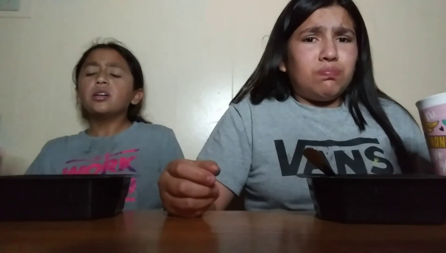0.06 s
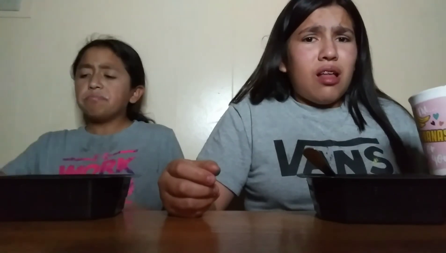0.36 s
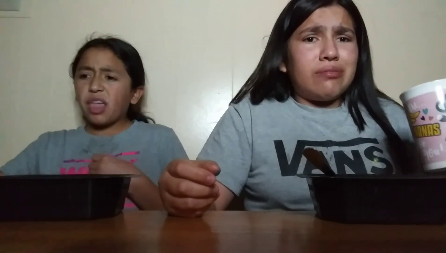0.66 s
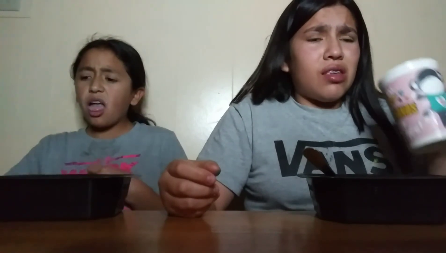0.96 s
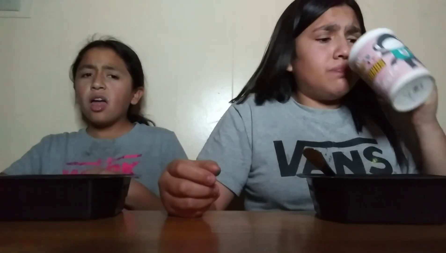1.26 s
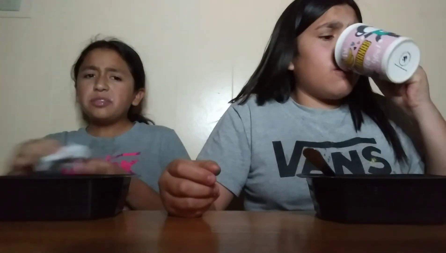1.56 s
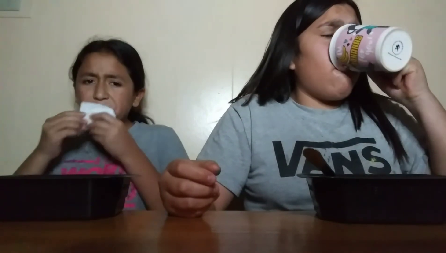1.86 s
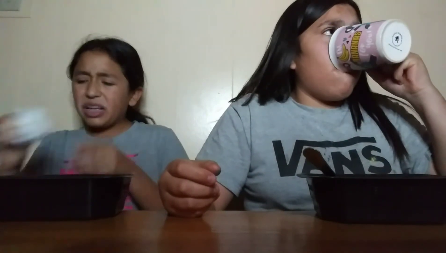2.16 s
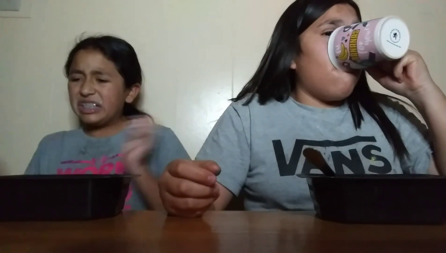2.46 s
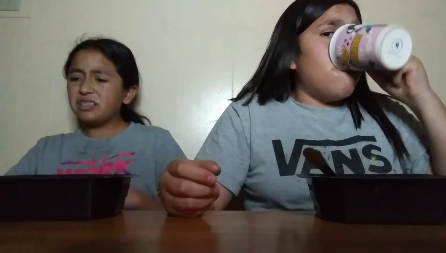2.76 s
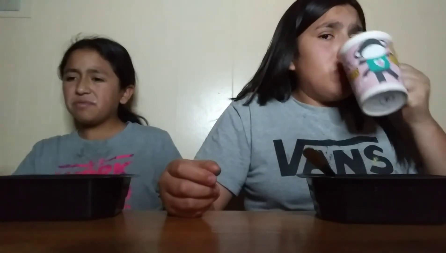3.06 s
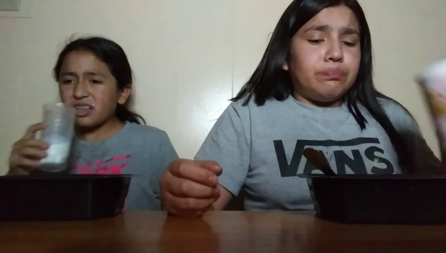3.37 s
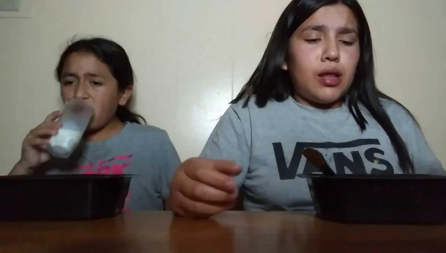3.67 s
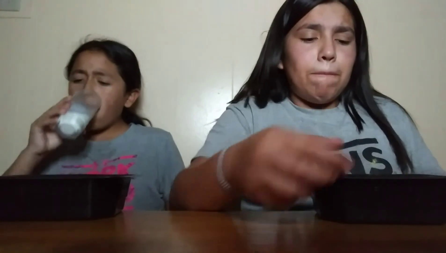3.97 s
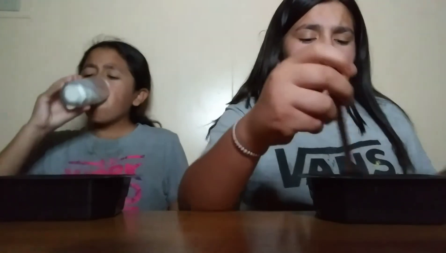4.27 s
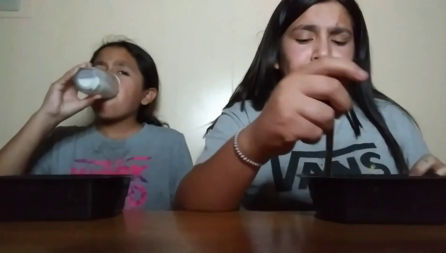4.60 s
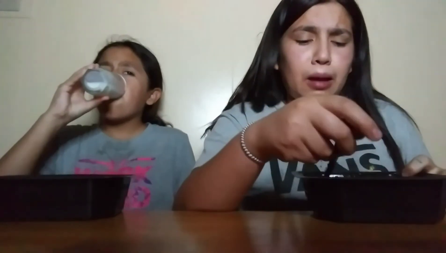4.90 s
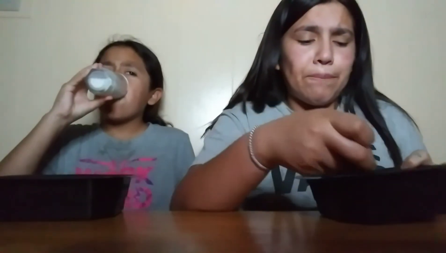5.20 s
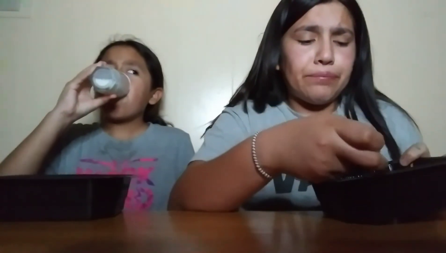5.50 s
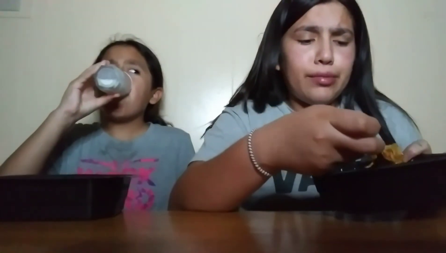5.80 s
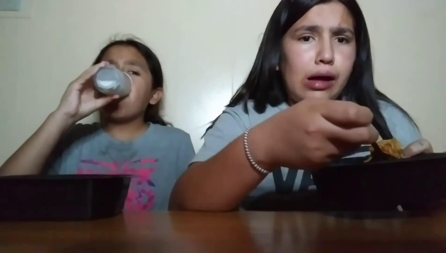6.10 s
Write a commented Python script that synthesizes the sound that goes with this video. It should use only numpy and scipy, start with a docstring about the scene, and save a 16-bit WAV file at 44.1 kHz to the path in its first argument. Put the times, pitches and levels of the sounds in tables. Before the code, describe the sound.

A plastic tumbler rattles on a wooden table, someone gulps, then a mug bangs down and a fork taps a plastic tray.

```python
"""A small, bare room: two people eat and drink at a wooden table, close to a microphone standing on it.
A plastic tumbler lands and rattles on its rim; a gulp and a squeak of suction at a mug follow, then the
mug comes down hard and sets the table top ringing. A fork clinks, knocks and pokes about in a plastic
food tray, among wet mouth clicks. An appliance hums behind it all; a limiter holds the loudest blows."""
import sys
import numpy as np
from scipy import signal
from scipy.io import wavfile
from scipy.ndimage import uniform_filter1d, minimum_filter1d

SR = 44100
rng = np.random.default_rng(int(sys.argv[2]) if len(sys.argv) > 2 else 0)


def unload_audio(sound):
    """Save the sound as a 16-bit wav file, at the path given as the first command line argument."""
    columns = np.transpose(np.atleast_2d(sound))
    # keep every value between -1 and 1, then stretch to whole-number steps
    steps = np.round(np.clip(columns, -1, 1) * 32767)
    wavfile.write(sys.argv[1], SR, steps.astype(np.int16))


N = 275580

# blows on the table: t/s, force/dB, contact cutoff/Hz, thud pitch/ratio, ring trim/dB, room send/dB
TABLE_BLOWS = [(0.4784, -6.5, 800, 1.023, 4.5, -1.5), (0.4931, -17, 640, 0.43, 0, 1.5),
               (0.546, -19.5, 895, 0.99, -4, 0.5), (.556, -13, 800, 0.83, 4.5, -2.5),
               (3.73, 6.5, 4800, 1.237, 0, -7), (3.7493, 0, 1600, 0.96, -27, -2.5),
               (3.8, -9, 1550, 1.028, 2, -0.5), (3.9895, -10.5, 3560, 1.57, -8, -6),
               (3.9916, -1, 1582, 0.79, -2.5, -8)]
# short thud at the point of contact: f/Hz, level/dB, t60/s
THUD_MODES = [(538, -3.5, 0.047), (786, 2, 0.026), (1129, 3, 0.01), (1830, -4, 0.014), (2590, -12, 0.0057),
              (4070, -9, 0.004)]
# long ring of the table top: f/Hz, level/dB, t60/s
TOP_MODES = [(215, -13, .3), (255, -14, .33), (339, -10, .33), (447, 2, .3), (475, -8, .25), (532, -5, .32),
             (608, -3, .36), (706, -4, .35), (725, -3, .38), (777, -4, .45), (802, -8, .4), (834, -8, .42),
             (883, -4, .35), (935, -2, .38), (981, 1, .36), (1024, -1, .34), (1053, 0, .38), (1150, -6, .3),
             (1222, -6, .42), (1327, -6, .36), (1367, -3, .3), (1475, -13, .3), (1690, -11, .3),
             (1914, -9, .25), (2035, -15, .3), (2326, -15, .3), (2460, -13, .28), (2610, -17, .28)]
# EQ of the wood's crack: f/Hz, level/dB
WOOD_EQ = [(60, -39), (250, 4), (900, 4.5), (2500, 14.5), (3500, -2), (5000, -3), (8000, -10.5),
           (15000, -7)]
def table_knocks(ring_db=-9, crack_db=-12, radiate_hz=330):
    """Blows thud and set the top ringing; soft contact dulls them. Returns direct sound and room send."""
    direct, send, top = np.zeros(N), np.zeros(N), ring(TOP_MODES)
    for s, db, cutoff_hz, pitch, ring_trim_db, send_db in TABLE_BLOWS:
        thud = ring([(hz * pitch, level, t60) for hz, level, t60 in THUD_MODES])
        thud += amp(crack_db) * crack(WOOD_EQ, t60=0.025)
        contact = signal.butter(2, cutoff_hz, fs=SR)
        add(direct, s, amp(db) * signal.lfilter(*contact, thud + amp(ring_db + ring_trim_db) * top))
        add(send, s, amp(db + send_db) * signal.lfilter(*contact, thud))
    # a small table top radiates little bass into the room
    return direct, signal.lfilter(*signal.butter(2, radiate_hz, "high", fs=SR), send)


# the tumbler's rim clacks on the wood, landing and settling: t/s, level/dB, brightness/(dB/octave)
RIM_CLACKS = [(.4832, -26.5, 5), (.4852, -29, 6), (.602, -22.5, -8.5), (.6465, -20, -6), (.664, -34, 6)]
# force of the rocking in between, easing and picking up again: t/s, level/dB
ROCK_ENVELOPE = [(.493, -25.5), (.507, -34), (.546, -42), (.559, -26.5)]
# dry click of the rim: f/Hz, level/dB, t60/s
RIM_MODES = [(1160, 13, 0.0084), (2190, 13, 0.011), (2880, 8, 0.016), (4360, 4.5, 0.011), (5700, -6, .007),
             (8150, -23, 0.0064)]
# hollow note of the tumbler's body: f/Hz, level/dB, t60/s
BODY_MODES = [(218.5, -9, 0.36), (444.5, -5, 0.33), (727, -4, 0.27), (900, 2, 0.23), (986, 5.5, 0.15)]
def tumbler(rock_start_s=0.493, rock_hz=75.3, rock_count=7, rock_tilt_db=4):
    """The hollow body rings as it lands, then it rocks on its rim and settles. Returns rim and body."""
    body = np.zeros(N)
    landing_s = TABLE_BLOWS[0][0]
    add(body, landing_s, amp(-12.5) * ring(BODY_MODES))
    times = rock_start_s + np.arange(rock_count) / rock_hz
    rocking = [(s, np.interp(s, *np.transpose(ROCK_ENVELOPE)), rock_tilt_db) for s in times]
    return plastic_hits(RIM_CLACKS + rocking, RIM_MODES, crack_db=-3.5), body


# fork taps on the food tray: t/s, level/dB, brightness/(dB/octave)
TRAY_TAPS = [(3.9925, -29, 11), (4.175, -13.5, 0.5), (4.3032, -20.5, -2.5), (4.3053, -20.5, -0.5),
             (4.466, -33, -3), (4.5828, -26, 2), (4.812, -32.5, 0), (4.8712, -32.5, 8.5)]
# dead knock of the tray: f/Hz, level/dB, t60/s
TRAY_MODES = [(338, -10, 0.011), (1020, -0.5, 0.013), (1160, -4, 0.024), (1370, 0, 0.0078),
              (2000, 0, 0.0039), (2780, -8, 0.0085), (4390, -11, 0.015), (6100, -14.5, 0.0056),
              (7900, -23.5, 0.0042)]
def tray_taps():
    """The fork pokes the thin plastic tray, which stops ringing almost at once."""
    return plastic_hits(TRAY_TAPS, TRAY_MODES, crack_db=-13)


# EQ of a tick on plastic: f/Hz, level/dB
PLASTIC_EQ = [(100, -11), (900, 6.5), (2500, 6.5), (3500, -9.5), (5500, -1.5), (8000, -16.5), (15000, -23)]
def plastic_hits(hits, modes, crack_db):
    """Light hits on a thin shell: quickly damped modes, and a tick that grows with brightness."""
    out = np.zeros(N)
    for s, db, tilt_db in hits:
        tick = amp(crack_db + tilt_db) * crack(PLASTIC_EQ, t60=0.029)
        add(out, s, amp(db) * (ring(modes, tilt_db) + tick))
    return out


# the fork rings freely: t/s, level/dB, brightness/(dB/octave), tine note/dB
FORK_CLINKS = [(3.897, -37.5, 3, -8.5), (3.938, -36, -6, -30), (3.953, -26.5, -3.5, 1)]
# shimmer of the steel: f/Hz, level/dB, t60/s
FORK_MODES = [(1992, -11, .75), (2128, -15, .85), (3375, -24, .3), (5905, -11, .11), (6562, -22, .25),
              (7698, -16, .08), (9620, -27, .07), (10750, -26, .07), (12330, -29, .13)]
def fork_clinks(tine_hz=4727, tine_t60=0.22):
    """Steel rings long; the tines sing out only when they are struck themselves."""
    out = np.zeros(N)
    for s, db, tilt_db, tine_db in FORK_CLINKS:
        add(out, s, amp(db) * ring(FORK_MODES + [(tine_hz, tine_db, tine_t60)], tilt_db))
    return out


# short sharp clicks: lip smacks, and light ticks of a fork or bracelet near 4.25 s: t/s, level/dB, f/Hz, upper
# resonance/Hz, its relative level/dB, t60/s
SHORT_CLICKS = [(.305, -42.5, 5720, 6300, -7, 0.015), (.923, -43, 4400, 6500, 1, .006),
                (.945, -45, 6150, 7950, -1, .015), (2.0993, -35, 5200, 8240, -7, 0.0066),
                (2.82, -36.5, 4200, 5000, -10, .014), (3.59, -49, 7800, 9500, -2, .012),
                (4.2532, -23.5, 4800, 6260, -4, 0.014), (4.2546, -32, 7700, 8600, -5, 0.0083),
                (4.2656, -26, 4500, 7900, -9, .008), (4.849, -38, 6200, 6870, -9, 0.0084),
                (4.8735, -35.5, 2200, 4900, -9, 0.027), (5.756, -26.5, 597, 1724, -8.5, 0.087),
                (5.7567, -41.5, 4260, 6940, -2, 0.018), (5.93, -48, 8060, 6500, -6, 0.016)]
def short_clicks():
    """Short clicks ring in two resonances: small wet cavities pop, the smaller the higher, and near 4.25 s a
    fork or bracelet ticks lightly."""
    out = np.zeros(N)
    for s, db, hz, upper_hz, upper_db, t60 in SHORT_CLICKS:
        add(out, s, amp(db) * ring([(hz, 0, t60), (upper_hz, upper_db, t60)]))
    return out


# soft gurgles of one swallow: t/s, level/dB, f/Hz, length/s
GULP_GURGLES = [(2.67, -44.5, 523, 0.021), (2.738, -40, 457, 0.022), (2.785, -36, 393.3, 0.027),
                (2.797, -37, 665, 0.032), (2.861, -51, 690, 0.012)]
# throat resonances in each gurgle: pitch/ratio, level/dB
THROAT_MODES = [(1, 0), (0.71, -17), (2.7, -18)]
def gulp(width_hz=160):
    """Pockets of air squeezed down the throat: each is a soft swell of unsteady tone."""
    out = np.zeros(N)
    for s, db, hz, length in GULP_GURGLES:
        t = np.arange(round(3 * length * SR)) / SR
        squeeze = (2 * t / length) ** 2 * np.exp(2 - 4 * t / length)
        for ratio, mode_db in THROAT_MODES:
            wander = np.cumsum(rng.standard_normal(len(t))) * np.sqrt(2 * np.pi * width_hz / SR)
            phase = 2 * np.pi * ratio * hz * t + uniform_filter1d(wander, size=40)
            add(out, s, amp(db + mode_db) * squeeze * np.sin(phase))
    return out


# pulls of suction at the mug's rim: t/s, level/dB, starting f/Hz, t60/s
SUCTION_PULLS = [(2.902, -50, 8450, .05), (2.913, -41, 8130, 0.1), (2.96, -54.5, 7830, 0.18),
                 (3.064, -65, 8220, 0.61), (3.272, -69.5, 7700, 0.36), (3.515, -73, 7650, .3)]
def rim_squeak(sag_hz_per_s=1500, hiss_db=-13, flutter_db=3):
    """Air whistles fitfully through two thin gaps between lip and rim; each pull sags in pitch."""
    t = np.arange(N) / SR
    tones, suction = np.zeros(N), np.zeros(N)
    for s, db, hz, t60 in SUCTION_PULLS:
        pull = amp(db) * swell(s, length=0.018, rise_s=0.0083, t60=t60)
        tones += pull * fuzzy_tone(hz - sag_hz_per_s * np.clip(t - s, 0, t60), width_hz=260)
        suction += pull
    flutter = unit_rms(amp(flutter_db * np.clip(fuzzy_tone(0, width_hz=110), -2, 1)))
    # the second, wider gap holds one pitch and follows the suction only in part
    gap_tone = fuzzy_tone(6650, width_hz=240) + amp(-10) * fuzzy_tone(12000, width_hz=2000)
    wide_gap = amp(-31) * suction ** 0.53 * gap_tone
    hiss = amp(hiss_db) * suction * fuzzy_tone(6200, width_hz=1300)
    return flutter * (tones + hiss + wide_gap)


# drags of the fork: t/s, length/s, level/dB
FORK_DRAGS = [(4.28, 0.13, -52), (4.45, 0.35, -61), (4.83, 0.2, -58)]
def fork_scrape(grit_db=4, grit_hz=4200):
    """The fork drags through food and over plastic: uneven slips with a gritty band in the treble."""
    drag = slips(FORK_DRAGS, grains_per_s=1100, spread_db=2.5)
    grit = signal.lfilter(*signal.iirpeak(grit_hz, 1, fs=SR), drag)
    return drag + amp(grit_db) * grit


# handling and sipping moves: t/s, length/s, level/dB
HANDLING_STROKES = [(1.11, 0.12, -51.5), (2.25, 0.065, -60), (2.4, 0.41, -56), (2.79, 0.14, -52)]
# light handling ticks: t/s, level/dB
HANDLING_TICKS = [(1.116, -42), (1.1359, -34.5), (1.194, -32.5), (1.202, -34), (2.252, -41), (2.2776, -38)]
# EQ of the ticks and of all friction grains: f/Hz, level/dB
FRICTION_EQ = [(100, -28.5), (450, 6.5), (1100, 2.5), (1700, -4), (2300, 0), (3400, -12), (4600, -12),
               (8000, -21.5), (15000, -35)]
def handling_rustle():
    """Hands and cups rustle softly, with a few light ticks."""
    out = slips(HANDLING_STROKES, grains_per_s=560, spread_db=0)
    for s, db in HANDLING_TICKS:
        tick = crack(FRICTION_EQ, t60=0.041)
        add(out, s, amp(db) * tick / abs(tick).max())
    return out


def slips(strokes, grains_per_s, spread_db):
    """Friction: tiny slips at random moments, swelling under each stroke."""
    size = amp(spread_db * np.minimum(rng.exponential(1, N), 4)) * rng.choice([-1., 1.], N)
    slipping = rng.random(N) < grains_per_s / SR
    grains = unit_rms(equalise(size * slipping, FRICTION_EQ))
    return grains * sum(amp(db) * swell(s, length, rise_s=0.02, t60=0.33) for s, length, db in strokes)


# reverb time by band: f/Hz, t60/s
ROOM_DECAY = [(150, 0.94), (500, 0.39), (1000, 0.45), (2500, 0.53), (5000, 0.37), (9000, 0.34),
              (16000, 0.37)]
# EQ of the reverb: f/Hz, level/dB
ROOM_EQ = [(60, -30), (160, -26), (230, -6), (330, 1), (480, -0.5), (900, 3), (1600, -1), (2500, -5.5),
           (4500, -3), (9000, -1), (16000, -6)]
def room(send, build_s=0.006, reflections=4000):
    """Dense reflections off bare walls build up, then die at their own speed in each band."""
    spacing = SR // reflections
    arrivals = np.arange(reflections) * spacing + rng.integers(0, spacing, reflections)
    echoes = np.zeros(SR)
    echoes[arrivals] = rng.choice([-1., 1.], reflections)
    hz, t, bands = signal.stft(echoes, SR, nperseg=256)
    tail = signal.istft(bands * decay(t, curve_at(ROOM_DECAY, hz)[:, None]), SR)[1][:SR]
    tail *= 1 - np.exp(-(np.arange(SR) / SR / build_s) ** 2)
    return signal.oaconvolve(send, equalise(tail / np.linalg.norm(tail), ROOM_EQ))[:N]


# EQ of the appliance's rush: f/Hz, level/dB
RUSH_EQ = [(20, -68), (90, -35), (150, -20), (210, -7.5), (300, -6), (400, 0.5), (700, -2.5), (1500, -7.5),
           (2600, -11), (3400, -19.5), (4600, -18.5), (6300, -23), (9000, -31), (16000, -33.5)]
# its hum, one pure tone and then two fuzzy ones: f/Hz, level/dB
HUM_TONES = [(132, -67), (388, -62.5), (598, -70.5)]
def appliance(rush_db=-52, waver_db=0.94):
    """A household appliance hums under a steady rush whose level wavers slightly."""
    t = np.arange(N) / SR
    waver = sum(np.sin(2 * np.pi * (hz * t + rng.random())) / np.sqrt(hz)
                for hz in np.geomspace(0.5, 12, 20))
    rush = unit_rms(equalise(rng.standard_normal(N), RUSH_EQ))
    rush *= amp(rush_db - waver_db * unit_rms(waver))
    pure_hz, pure_db = HUM_TONES[0]
    hum = amp(pure_db) * np.sqrt(2) * np.sin(2 * np.pi * pure_hz * t)
    return rush + hum + sum(amp(db) * fuzzy_tone(hz, width_hz=15) for hz, db in HUM_TONES[1:])


def ring(modes, tilt_db=0):
    """A struck object: damped modes of alternating sign, tilted in dB per octave; peak 1."""
    t = np.arange(SR * 3 // 4) / SR
    out = sum((-1) ** k * amp(db + tilt_db * np.log2(hz)) * decay(t, t60) * np.sin(2 * np.pi * hz * t)
              for k, (hz, db, t60) in enumerate(modes))
    return out / abs(out).max()


def crack(eq, t60):
    """Countless short-lived modes: a burst of dying noise."""
    t = np.arange(SR * 3 // 4) / SR
    return equalise(rng.standard_normal(len(t)) * decay(t, t60), eq)


def fuzzy_tone(hz, width_hz):
    """A band of noise carried along a pitch curve; rms 1."""
    noise = rng.standard_normal(N) + 1j * rng.standard_normal(N)
    flutter = signal.lfilter(*signal.butter(2, width_hz / 2, fs=SR), noise)
    carrier = np.exp(2j * np.pi * np.cumsum(hz * np.ones(N)) / SR)
    return unit_rms((flutter * carrier).real)


def swell(s, length, rise_s, t60):
    """Envelope of one gesture: it rises, holds to the end of its length, and dies away."""
    t = np.arange(N) / SR - s
    return np.clip(t / rise_s, 0, 1) * decay(np.maximum(t - length, 0), t60)


def decay(t, t60):
    """Falls 60 dB every t60 seconds."""
    return np.exp(-np.log(1000) * t / t60)


def equalise(x, eq):
    """Minimum-phase filter that follows an EQ curve."""
    log_gain = np.log(amp(curve_at(eq, abs(np.fft.fftfreq(4096, 1 / SR)))))
    taps = np.fft.ifft(np.exp(np.conj(signal.hilbert(log_gain)))).real
    return signal.oaconvolve(x, taps)[:len(x)]


def curve_at(points, hz):
    """Reads a curve on a log-frequency axis."""
    f, value = np.transpose(points)
    return np.interp(np.log(hz + 1), np.log(f + 1), value)


def amp(db):
    """Decibels to gain."""
    return 10 ** (np.asarray(db) / 20)


def unit_rms(x):
    """Scales to rms 1."""
    return x / np.sqrt(np.mean(x ** 2) + 1e-20)


def add(mix, s, sound):
    """Mixes a sound in at time s."""
    part = mix[round(s * SR):][:len(sound)]
    part += sound[:len(part)]


def scene():
    """Mono mix: the close sounds, their reverb and the appliance bed."""
    knocks, knock_send = table_knocks()
    rim, body = tumbler()
    # sound, room send/dB
    layers = [(rim, -2.5), (tray_taps(), -6), (fork_clinks(), -7.5), (short_clicks(), -6.5),
              (gulp(), -4.5), (rim_squeak(), -9), (handling_rustle(), -7.5), (fork_scrape(), 0.5)]
    direct = knocks + body + sum(sound for sound, _ in layers)
    send = knock_send + sum(amp(send_db) * sound for sound, send_db in layers)
    return (direct + room(send) + appliance())[None]


def record(dry, shelf_hz=175, shelf_db=-26, knee=1.03, ceiling_db=-1.7, release_db_per_s=380):
    """A bass-cut shelf, slight overload, a fast peak limiter, then a steep high cut."""
    low_cut = signal.butter(4, shelf_hz, "high", fs=SR, output="sos")
    x = signal.sosfilt(low_cut, dry[0]) + amp(shelf_db) * dry[0]
    x -= 0.5 * np.maximum(x - knee, 0)  # one-sided overload puts a low thump under the hardest blow
    over_db = np.maximum(20 * np.log10(abs(x) + 1e-9) - ceiling_db, 0)
    release_db = np.arange(N) * release_db_per_s / SR
    reduction_db = np.maximum.accumulate(over_db + release_db) - release_db
    x *= uniform_filter1d(minimum_filter1d(amp(-reduction_db), size=31), size=31)
    high_cut = signal.firwin(511, cutoff=15850, window=("kaiser", 9), fs=SR)
    return signal.oaconvolve(x, high_cut, "same")[None]


dry = scene()
out = record(dry)
unload_audio(out)
```